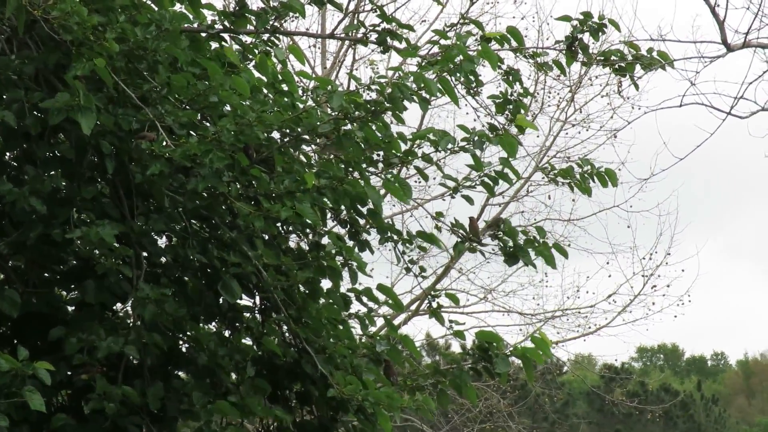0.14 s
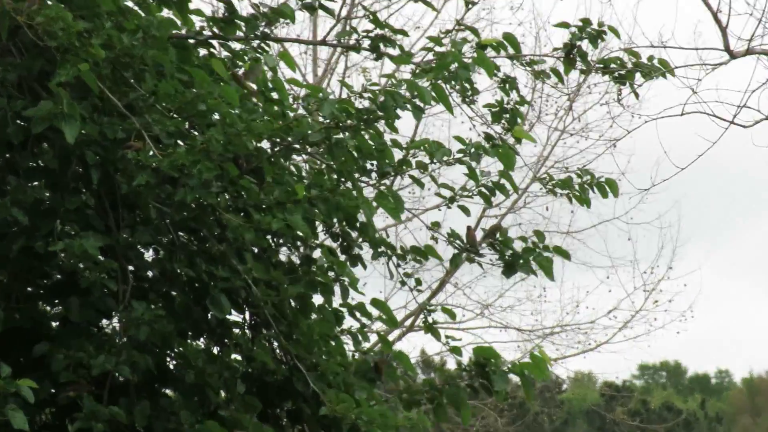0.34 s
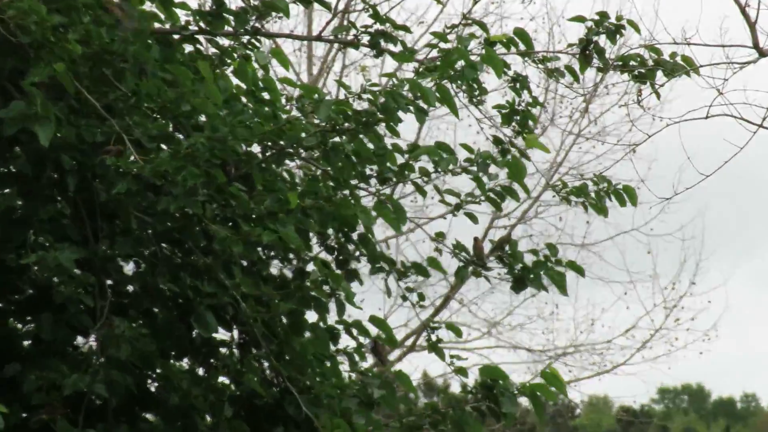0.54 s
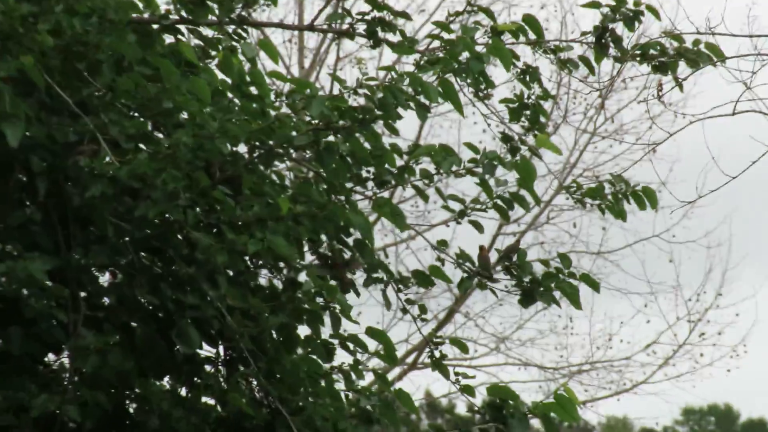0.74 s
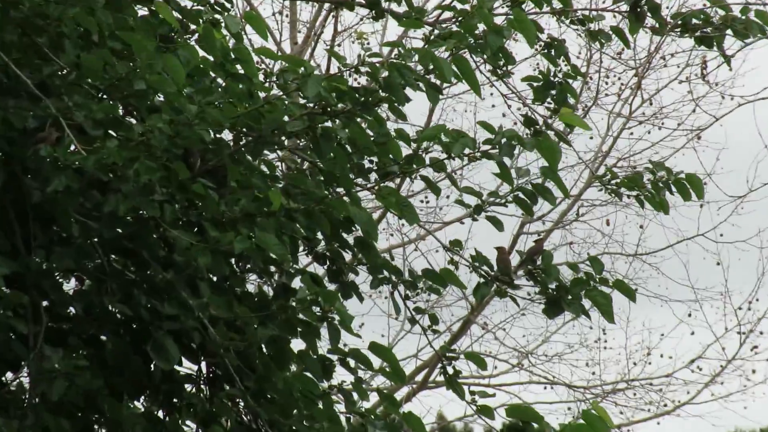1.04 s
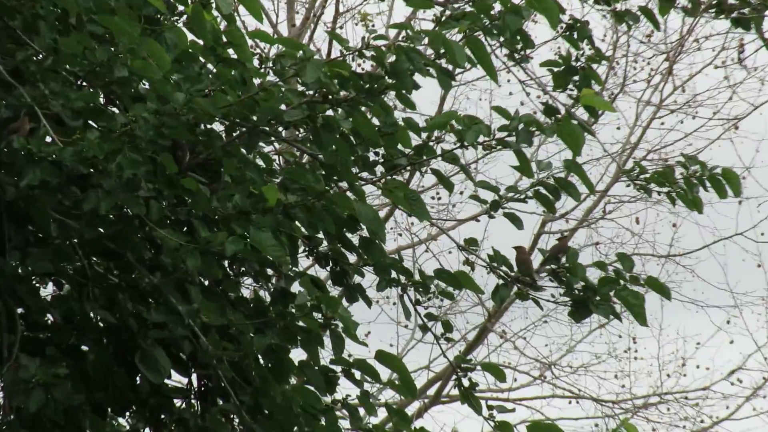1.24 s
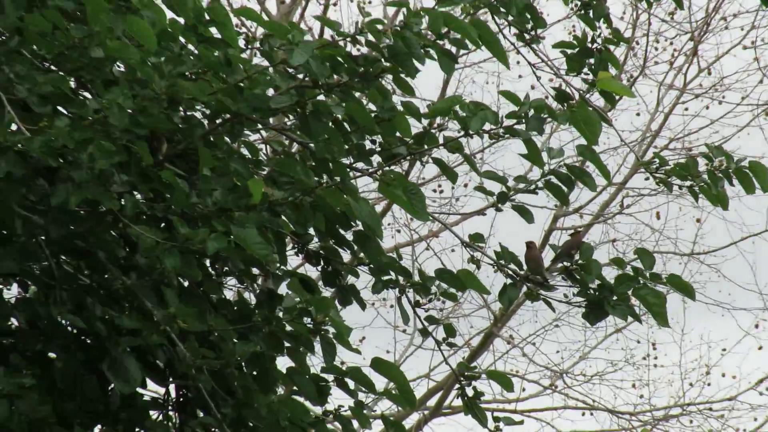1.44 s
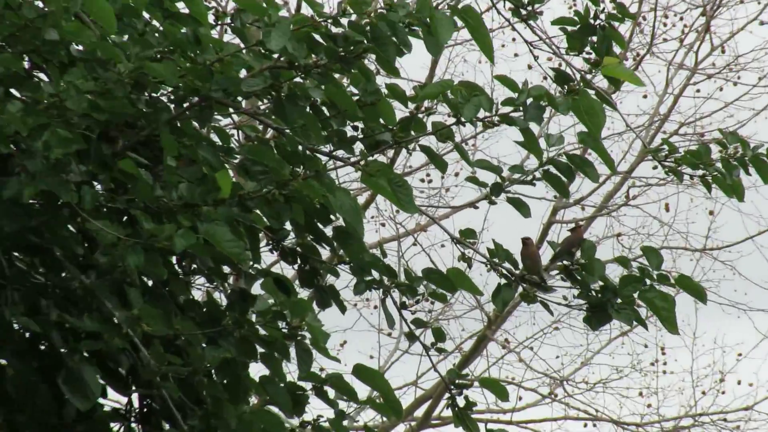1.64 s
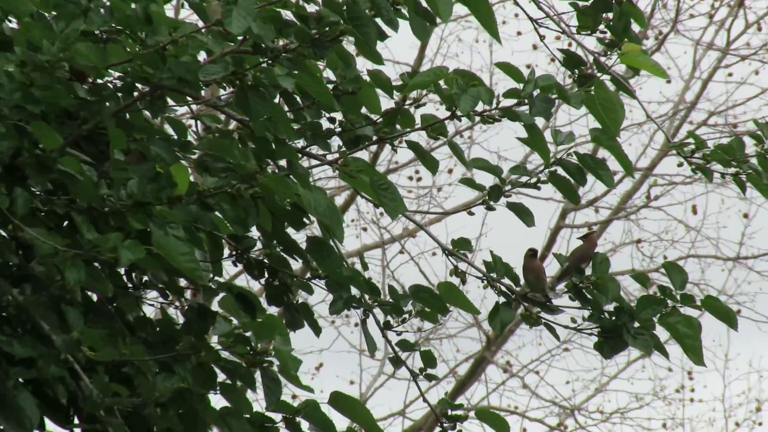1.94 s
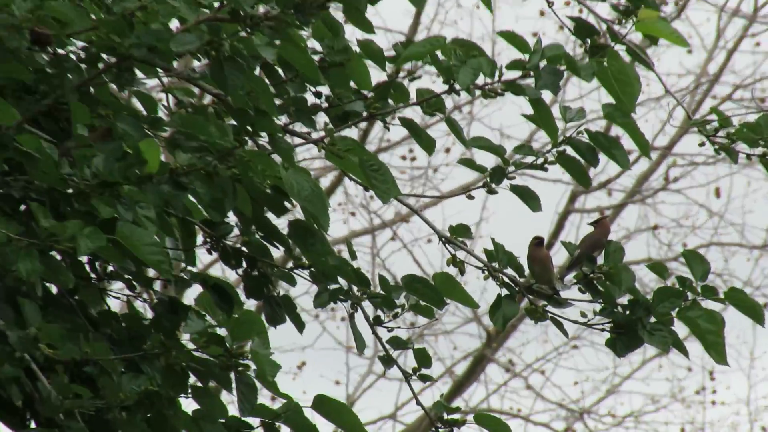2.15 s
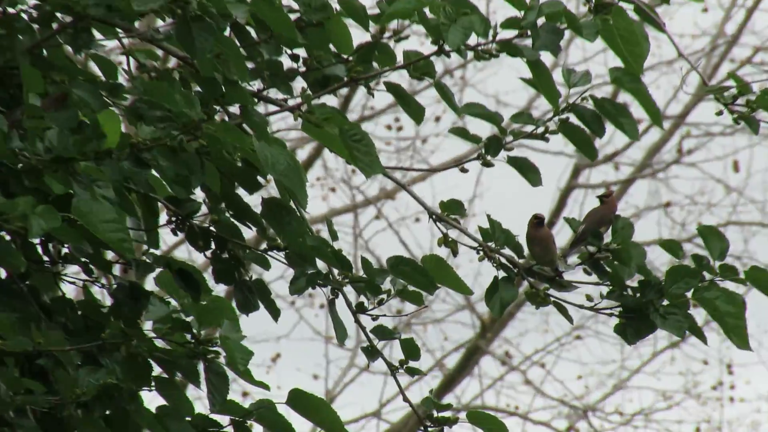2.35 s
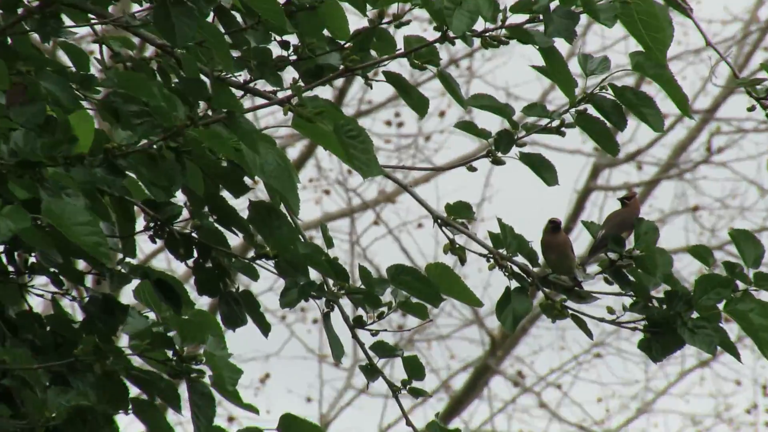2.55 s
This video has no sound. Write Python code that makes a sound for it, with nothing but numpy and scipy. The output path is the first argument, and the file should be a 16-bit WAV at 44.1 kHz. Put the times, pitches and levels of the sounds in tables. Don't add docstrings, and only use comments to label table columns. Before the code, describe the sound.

Small birds trill shrilly in bursts from a leafy tree, over wind rumble, hiss and camera zoom noise

```python
import sys
import numpy as np
from scipy import signal
from scipy.io import wavfile

SR = 44100
rng = np.random.default_rng(int(sys.argv[2]) if len(sys.argv) > 2 else 0)


def master_out(mix):
    frames = np.transpose(np.atleast_2d(mix))
    ceiling = np.clip(frames, -1, 1)
    pcm = np.round(ceiling * 32767).astype(np.int16)
    wavfile.write(sys.argv[1], SR, pcm)


def invert_db(x):
    u = np.asarray(x, float) / 20
    return 10 ** u


N = 119511
TIME = np.arange(N) / SR


def rms_one(x):
    return x / np.sqrt(np.mean(x ** 2) + 1e-20)


def at_hz(points, hz):
    points_hz, values = np.transpose(points)
    return np.interp(np.log(hz), np.log(points_hz), values)


def drift(rate_hz):
    pole = np.exp(-80 * np.pi * rate_hz / SR)
    white = rng.standard_normal(N // 40 + 2002)
    slow = signal.lfilter([1], [1, -2 * pole, pole ** 2], white)[2000:]
    return np.interp(np.arange(N) / 40, np.arange(len(slow)), rms_one(slow))


def pair(mid, side, alike):
    alike = np.clip(alike, -1, 1)
    common = np.sqrt(.5 + .5 * alike) * mid
    opposed = np.sqrt(.5 - .5 * alike) * side
    return common + opposed * [[1], [-1]]


def tone(hz, gain):
    return np.sqrt(2) * gain * np.sin(2 * np.pi * np.cumsum(hz) / SR)


def held(start, length, edge):
    nearest_end = np.minimum(TIME - start, start + length - TIME)
    return np.sin(np.pi / 2 * np.clip(nearest_end / edge, 0, 1)) ** 2


def glide(start, length, first_hz, last_hz):
    return np.interp(TIME, [start, start + length], [first_hz, last_hz])


def among_leaves(x, wet_db, pan_db):
    t60_s = .1
    t = TIME[:SR // 4]
    tail = rng.standard_normal((2, len(t))) * invert_db(-60 * t / t60_s) * (t > .002)
    tail = tail / np.sqrt(np.sum(tail ** 2, axis=1, keepdims=True))
    direct = x * invert_db([[pan_db / 2], [-pan_db / 2]])
    scattered = signal.fftconvolve(x[None], tail, axes=1)[:, :N]
    return direct + invert_db(wet_db) * scattered


# f/Hz, likeness/1
LIKENESS = [(45, .9995), (80, .975), (140, .8), (240, -.05), (640, -.1), (1410, -.17), (4000, -.1),
            (15000, -.25)]


def banded_noise(spectrum, patchy_db):
    out = 0
    edges_hz = 20 * 2 ** np.arange(0, 9.8, 1 / 3)
    white = rng.standard_normal((2, 2, N + 8000))
    for k, (low, high) in enumerate(zip(edges_hz, edges_hz[1:])):
        hz = np.sqrt(low * high)
        flicker = drift(8.8)
        if spectrum[0][0] <= hz <= spectrum[-1][0]:
            band = signal.butter(2, [low, high], "band", fs=SR, output="sos")
            mid, side = signal.sosfilt(band, white[k % 2])[:, -N:]
            gain = invert_db(at_hz(spectrum, hz) + patchy_db * flicker)
            out = out + gain * pair(mid, side, at_hz(LIKENESS, hz))
    return rms_one(out)


# f/Hz, level/dB per Hz
RUMBLE = [(21, -32), (35, -13.5), (58, -2), (110, -13.5), (260, -5), (500, -13), (850, -13.5), (1500, -25)]
# t/s, level/dB
BREEZE = [
    (0, -0.5),
    (.3, -1),
    (.45, 0.5),
    (.7, 0.5),
    (1.2, 0.24),
    (1.6, -0.7),
    (2.1, 0.5),
    (2.71, 0.26),
]


def rumble():
    breeze_db = np.interp(TIME, *np.transpose(BREEZE))
    return invert_db(-46 + breeze_db) * banded_noise(RUMBLE, patchy_db=.5)


# f/Hz, level/dB per Hz
HISS = [(900, -3), (1600, 1), (3000, -2.5), (6000, -9), (8300, -10.5), (9500, -17.5), (10200, -14.5),
        (15500, -27.5)]
# t/s, level/dB
MOTOR = [
    (0, -2.5),
    (.39, -2.5),
    (.41, 2.5),
    (.55, 1.2),
    (.9, 0.5),
    (1.5, 0.5),
    (2.1, 0.2),
    (2.71, 0.6),
]


def hiss():
    dull_hz, dull_share = 8000, .3
    motor_db = np.interp(TIME, *np.transpose(MOTOR))
    air = invert_db(-57.5 + motor_db) * banded_noise(HISS, patchy_db=.4)
    top = signal.sosfiltfilt(signal.butter(2, dull_hz, "high", fs=SR, output="sos"), air)
    idle = TIME < MOTOR[1][0]
    return air - dull_share * top * idle


def hum():
    pitch_hz, wander_hz, level_db = 149.3, 1.62, -58.5
    start_s, idle_db = .48, -4.5
    running_db = np.interp(TIME, [start_s, start_s + .06], [idle_db, 0])
    line = tone(pitch_hz + wander_hz * drift(3), invert_db(2 * drift(3)))
    return invert_db(level_db + running_db) * line * invert_db([[.5], [-.5]])


def narrow(width_hz, hz):
    r = np.exp(-np.pi * width_hz / SR)
    x = rng.standard_normal((2, N + SR))
    for _ in range(2):
        x = signal.lfilter([1, 0, -1], [1, -2 * r * np.cos(2 * np.pi * hz / SR), r * r], x)
    return rms_one(x[:, SR:])


# f/Hz, bandwidth/Hz, left-right likeness/1
INSECTS = [(8620, 300, .3), (8800, 40, .8), (8950, 120, .1), (9120, 60, .85), (9200, 90, .3),
           (9320, 160, -.3)]
INSECT_DB = [-76.5, -76.5, -75, -75.5, -74.5, -74.5]


def insects():
    throb_per_s, throb_share = 58, .4
    out = 0
    for (hz, width_hz, alike), db in zip(INSECTS, INSECT_DB):
        wing_rate = throb_per_s * rng.uniform(.8, 1.2) * (1 + .15 * drift(8))
        throb = 1 + throb_share * np.sin(2 * np.pi * np.cumsum(wing_rate) / SR)
        out = out + invert_db(db) * throb * pair(*narrow(width_hz, hz), alike)
    return out


# start t/s, length/s, level/dB, first f/Hz, last f/Hz
WHISTLES = [(.021, .024, -64, 2400, 2460), (.038, .026, -61, 2480, 2310), (.057, .024, -62, 2310, 2430),
            (.078, .026, -67, 2430, 2520), (.126, .03, -59.5, 2090, 2050), (.152, .04, -62, 2110, 2200),
            (.185, .025, -69, 2170, 2130), (.213, .022, -57.5, 2060, 2080), (.23, .016, -64, 1990, 1940),
            (.238, .024, -62, 1990, 2090), (.258, .04, -68, 2030, 2050), (.298, .023, -57.5, 2060, 1960),
            (.325, .028, -61, 1990, 2070), (.455, .035, -69, 2120, 2030), (.526, .04, -59, 2290, 2310),
            (.559, .032, -64, 2440, 2460), (.618, .024, -65, 2110, 1970), (.636, .03, -59, 1920, 2080),
            (.66, .024, -66, 2080, 2120), (.711, .023, -62.5, 2040, 1980), (.738, .033, -61, 1970, 2090),
            (.78, .036, -67, 2070, 1960)]


def songbird():
    warble_per_s, warble_hz, warble_db = 80, 12, 2.2
    quaver = warble_hz * drift(warble_per_s)
    flutter = warble_db * drift(warble_per_s)
    out = np.zeros(N)
    for s, length, db, first_hz, last_hz in WHISTLES:
        gain = invert_db(db + flutter) * held(s, length, edge=.008)
        out += tone(glide(s, length, first_hz, last_hz) + quaver, gain)
    return among_leaves(out, wet_db=-14, pan_db=-1.5)


# centre t/s, level/dB, f/Hz
PIPS = [(.541, -64, 7100), (.659, -62, 7520), (.672, -65, 7330), (.712, -66, 6850), (.72, -67, 7050),
        (.693, -55, 7540), (.728, -61, 7500), (.738, -65, 7250), (.744, -66, 7000), (.758, -68, 7150),
        (.773, -61, 6960), (.793, -59, 7510), (1.483, -65, 6950), (1.578, -66, 6950), (1.598, -67.5, 7500),
        (1.615, -65, 6950), (1.635, -64, 7520), (1.652, -69, 6900), (1.674, -68.5, 7420),
        (1.921, -67, 7400)]
# centre t/s, level/dB, f/Hz, rise/Hz per width
RISES = [(.058, -70, 6950, 200), (.196, -69, 7400, 150), (1.134, -67, 7520, 0), (1.155, -64, 7250, 250),
         (1.163, -67, 7480, 0), (1.174, -65, 7500, 30), (1.177, -65, 7870, 0), (1.19, -65, 7860, -30),
         (1.196, -67, 7050, 250), (1.205, -65, 7360, 0), (1.212, -68, 7370, 30), (1.219, -64, 7800, -120),
         (1.229, -68, 7350, 60), (1.234, -69, 7850, 0), (1.242, -64, 7050, 0), (1.251, -69, 6900, 0),
         (1.259, -67, 7020, 60), (1.497, -69, 7850, 0), (1.505, -65.5, 7400, -100), (1.517, -66, 7550, 100),
         (1.537, -67, 7500, 200), (1.56, -69, 7450, -60), (1.969, -65, 7950, 250), (1.987, -64, 7550, 250),
         (2.008, -64, 7750, 150), (2.025, -64, 7300, 250), (2.037, -63, 7480, 30), (2.047, -58, 7540, 50),
         (2.055, -64, 7620, 60), (2.069, -61, 7200, 130), (2.084, -66, 7350, 150), (2.091, -63, 7430, 150),
         (2.101, -62, 7500, 40), (2.108, -62, 7040, 0), (2.133, -66, 7080, -80), (2.337, -70, 7080, 50),
         (2.352, -69, 7400, 50), (2.452, -69, 7180, 100), (2.459, -70, 7600, 150), (2.593, -72, 7200, 0)]
# start t/s, length/s, level/dB, first f/Hz, last f/Hz
BUZZES = [(0.052, 0.018, -73, 6800, 7000), (0.143, 0.063, -71, 6850, 6960), (0.206, .05, -72, 6950, 6700),
          (0.524, 0.03, -71, 7500, 7300), (0.69, 0.082, -73, 6930, 6980), (1.131, 0.14, -70, 7560, 6730),
          (1.463, .04, -73, 7260, 7570), (1.488, 0.074, -69, 7600, 7400), (1.547, .048, -71, 7250, 7070),
          (1.965, 0.18, -70, 7750, 6960), (2.33, 0.05, -71, 7000, 7260), (2.59, .03, -78, 7200, 7200)]


def waxwings():
    pip_s, pip_arch_hz = .0035, 35
    rise_s, husk_db = .003, 2.5
    buzz_per_s, buzz_hz, buzz_wander_hz, buzz_db = 165, 210, 70, 3.5
    out = np.zeros(N)
    for s, db, hz in PIPS:
        u = np.clip((TIME - s) / pip_s, -4, 4)
        bell = np.exp(-.5 * u ** 2) * (abs(u) < 4)
        out += tone(hz - pip_arch_hz * u ** 2, invert_db(db) * bell)
    husk = husk_db * drift(150)
    for s, db, hz, rise_hz in RISES:
        u = np.clip((TIME - s) / rise_s, -4, 4)
        bell = np.exp(-.5 * u ** 2) * (abs(u) < 4)
        out += tone(hz + rise_hz * u, invert_db(db + husk) * bell)
    warble_cycles = np.cumsum(buzz_per_s * (1 + .29 * drift(27))) / SR
    warble = buzz_hz * np.sin(2 * np.pi * warble_cycles) + buzz_wander_hz * drift(30.2)
    flutter = buzz_db * drift(130)
    for s, length, db, first_hz, last_hz in BUZZES:
        gain = invert_db(db + flutter) * held(s, length, edge=.01)
        out += tone(glide(s, length, first_hz, last_hz) + warble, gain)
    return among_leaves(out, wet_db=-12, pan_db=0)


# t/s, peak level/dB, ring f/Hz, t60/s
KNOCKS = [(.366, -47.5, 3870, .012), (.3665, -52, 4500, .007), (.366, -57, 3100, .008),
          (.3652, -42, 700, .032), (.369, -43, 950, .022), (.3672, -42.5, 1230, .028),
          (.378, -44, 330, .05), (.398, -48, 350, .04), (.43, -41, 420, .09), (.434, -46, 300, .04),
          (.446, -42, 410, .06), (.462, -44, 320, .035), (.464, -45, 620, .016), (.4645, -48, 950, .012),
          (.475, -48, 300, .05), (1.306, -48, 850, .04), (1.632, -44, 230, .08), (1.6583, -40, 1600, .0095),
          (1.657, -50, 260, .05), (1.665, -52, 1380, .018)]


def knocks():
    crack_db, crack_t60_s, rise_cycles = -17, .015, 1.6
    band = signal.butter(3, [500, 2500], "band", fs=SR, output="sos")
    crack = rms_one(signal.sosfilt(band, rng.standard_normal(N)))
    out = np.zeros(N)
    for s, db, hz, t60 in KNOCKS:
        t = np.maximum(TIME - s, 0)
        swell = invert_db(-60 * t / t60) * (1 - np.exp(-(t * hz / rise_cycles) ** 2))
        modes = np.sin(2 * np.pi * hz * t) + .2 * np.sin(2 * np.pi * 1.2 * hz * t)
        ring = swell / swell.max() * modes
        snap = invert_db(crack_db - 60 * t / crack_t60_s) * crack * (t > 0)
        out += invert_db(db) * (ring + snap)
    return among_leaves(out, wet_db=-12, pan_db=1.5)


def scene():
    background = rumble() + hiss() + hum() + insects()
    return background + songbird() + waxwings() + knocks()


def top_cut(x):
    return signal.sosfilt(signal.butter(12, 15590, fs=SR, output="sos"), x)


def record(dry):
    return top_cut(dry)


dry = scene()
out = record(dry)
master_out(out)
```